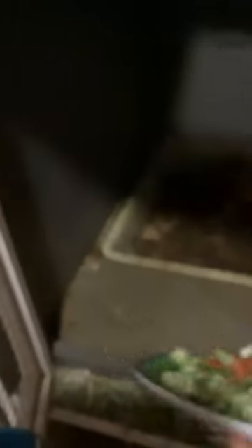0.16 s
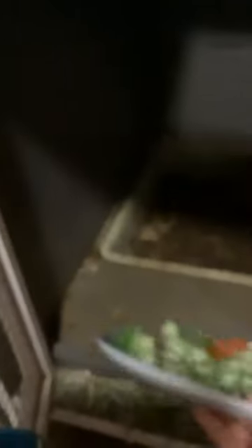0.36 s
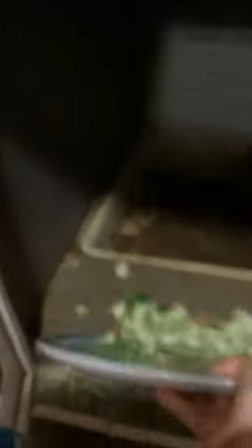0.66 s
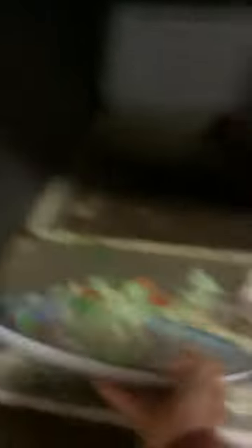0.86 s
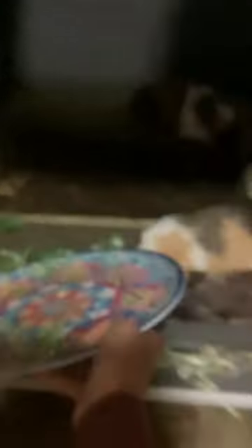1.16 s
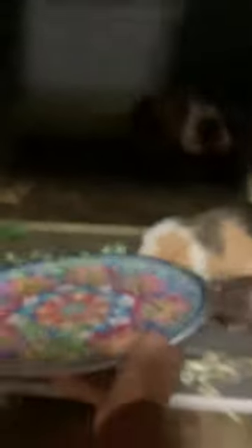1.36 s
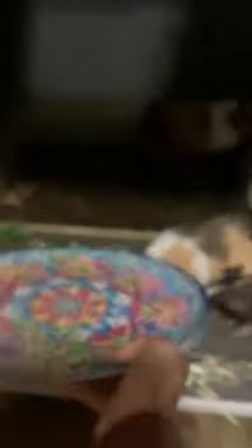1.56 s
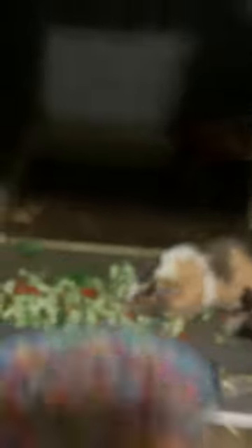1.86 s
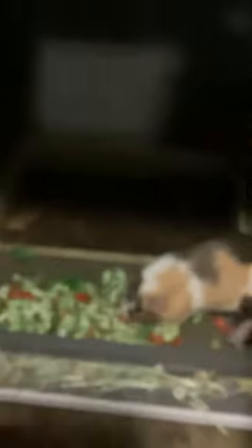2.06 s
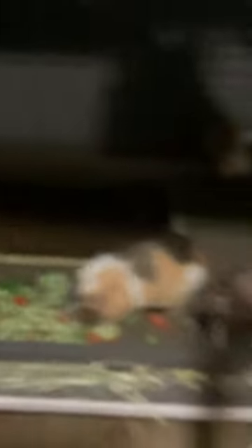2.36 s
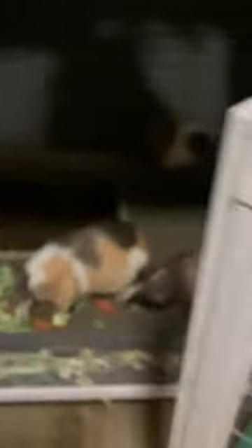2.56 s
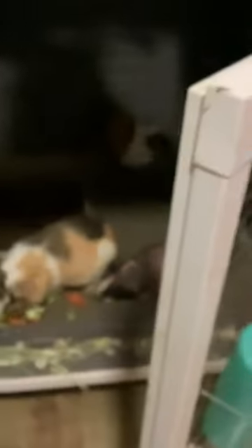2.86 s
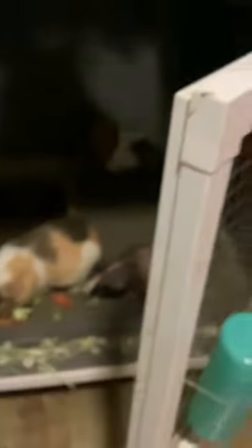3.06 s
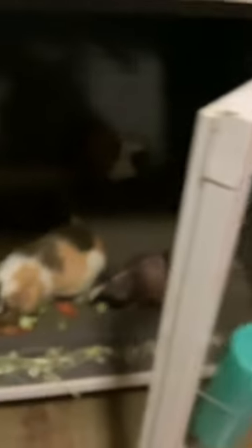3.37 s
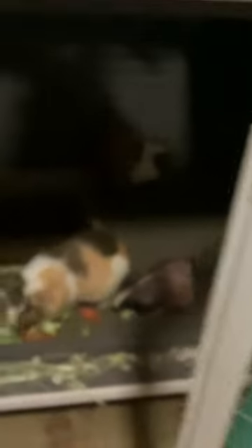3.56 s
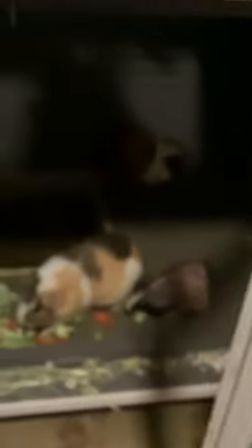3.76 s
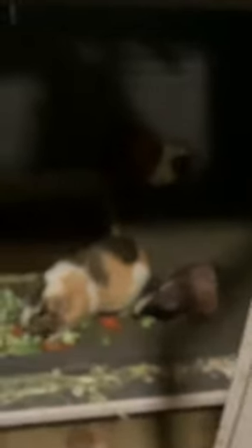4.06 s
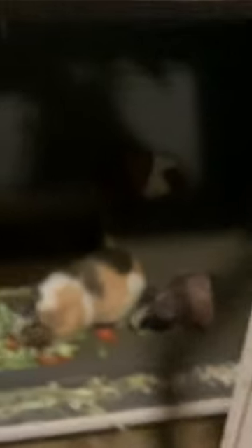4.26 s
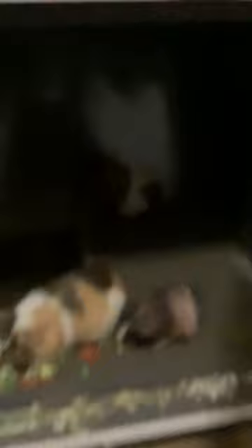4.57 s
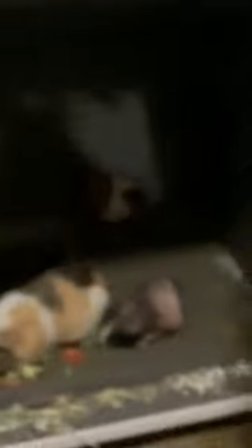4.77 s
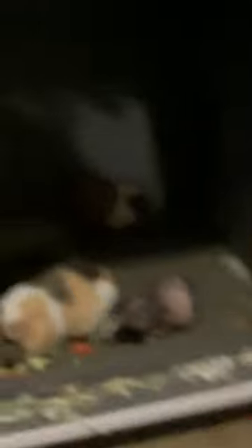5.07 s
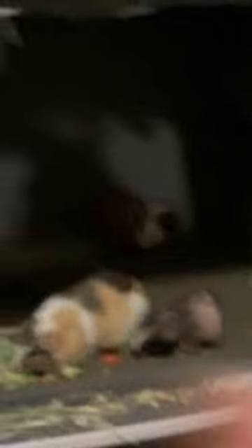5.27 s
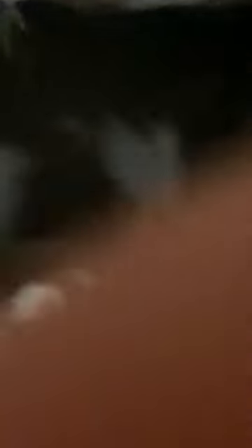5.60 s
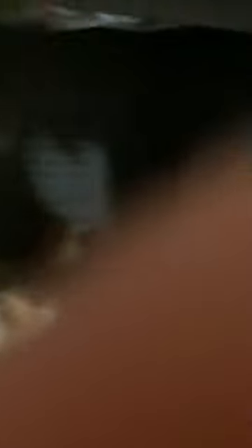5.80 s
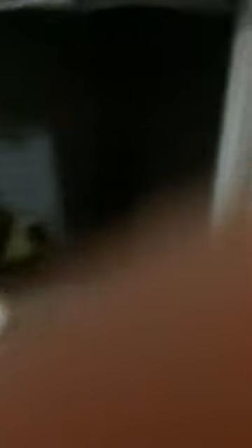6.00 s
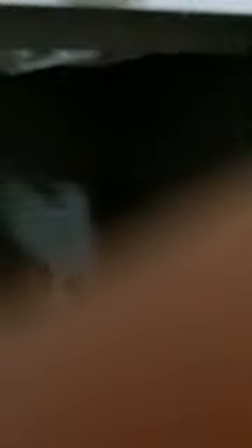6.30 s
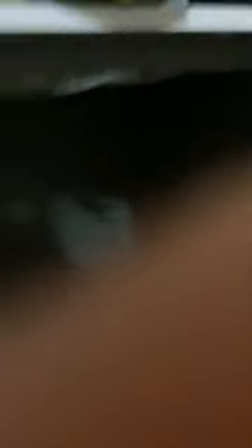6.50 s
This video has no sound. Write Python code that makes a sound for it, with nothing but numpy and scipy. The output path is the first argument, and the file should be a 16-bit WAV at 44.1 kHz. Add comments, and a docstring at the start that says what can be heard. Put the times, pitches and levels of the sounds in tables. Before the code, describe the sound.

Salad slides and patters off a china plate, a sharp plate knock, then a hutch door knocks, judders and bangs before quiet rustling and nibbling.

```python
"""In a quiet room, salad is tipped off a china plate into a wooden guinea pig hutch.
Leaves slide and patter as shaped noise; the rubbed plate rings faintly under them.
The plate knocks the hutch and the wire-mesh door knocks, judders and bangs: cracks, decaying modes and clatter.
The animals rustle and nibble, a hand fumbles near the microphone, and a thin tone whines faintly far away."""
import sys
import numpy as np
from scipy import signal
from scipy.fft import rfft, irfft, next_fast_len
from scipy.io import wavfile

SR = 44100
rng = np.random.default_rng(int(sys.argv[2]) if len(sys.argv) > 2 else 0)


def generate_wav(signal):
    """Clip the signal to [-1, 1] and save it as 16-bit WAV at the path in sys.argv[1]."""
    frames = np.transpose(np.atleast_2d(signal))
    scaled = np.clip(frames, -1, 1) * 32767
    pcm = np.round(scaled).astype(np.int16)
    wavfile.write(sys.argv[1], SR, pcm)


N = 292824
RING_SIZE = 16384  # longest single sound, in samples
AGE = np.arange(RING_SIZE) / SR  # seconds since a sound began
TIME = np.arange(N) / SR


def from_db(db):
    """Decibels to gain."""
    return 10 ** (np.asarray(db) / 20)


def rms_one(x):
    """Scale to unit power."""
    return x / np.sqrt(np.mean(x ** 2) + 1e-20)


def dying(t60):
    """Exponential decay by 60 dB in t60 seconds."""
    return np.exp(-np.log(1000) * AGE / max(t60, 1e-3))


def add(out, s, sound):
    """Mix a sound in at a time in seconds."""
    start = int(np.clip(s * SR, 0, N - 1))
    out[start:start + len(sound)] += sound[:N - start]


def envelope(points):
    """Gain over time, drawn in straight lines of decibels."""
    return from_db(np.interp(TIME, *np.transpose(points)))


def gains(spectrum, hz):
    """A spectrum's gain at given frequencies, falling away beyond its ends."""
    at, db = np.transpose(spectrum)
    inside = from_db(np.interp(np.log(hz + 1), np.log(at), db))
    below = np.minimum(hz / at[0], 1) ** 2
    above = np.minimum(at[-1] / (hz + 1), 1) ** 2
    return inside * below * above


def coloured(x, spectrum):
    """Give a noise a spectrum; rms 1."""
    size = next_fast_len(len(x))
    shaped = rfft(x, size) * gains(spectrum, np.fft.rfftfreq(size, 1 / SR))
    return rms_one(irfft(shaped, size)[:len(x)])


def low_pass(x, hz):
    """Second-order low-pass."""
    return signal.sosfilt(signal.butter(2, min(hz, .45 * SR), fs=SR, output="sos"), x)


def slow_noise(hz):
    """Noise of rms 1 that wanders no faster than about the given rate."""
    return rms_one(low_pass(rng.standard_normal(N), hz))


def grainy(size, spread_db, per_s):
    """Noise whose strength varies from one tiny contact to the next."""
    knots = np.clip(rng.standard_normal(size), -2, 2)
    strength_db = spread_db * np.interp(np.arange(size) * per_s / SR, np.arange(size), knots)
    return rng.standard_normal(size) * from_db(strength_db)


def ringing(modes, vary_db, detune_hz=20):
    """Decaying modes, each struck with a strength of its own and beating against a weaker neighbour."""
    hz, db, t60 = np.transpose(modes)
    chance = rng.standard_normal((len(hz), 2))
    strength = from_db(db + vary_db * chance[:, 0]) / np.linalg.norm(from_db(db))
    offset = detune_hz * (1 + np.abs(chance[:, 1])) * np.sqrt(hz / 500)
    neighbour = hz + np.sign(chance[:, 1]) * offset
    out = np.zeros(RING_SIZE)
    for k in range(len(hz)):
        pair = np.sin(2 * np.pi * hz[k] * AGE) + np.sin(2 * np.pi * neighbour[k] * AGE) / 3
        out += (-1) ** k * strength[k] * dying(t60[k]) * pair  # alternating polarity
    return out


def contact(hz, octaves, skirt_db, rise_s, t60):
    """A quickly dying hump of sound around one pitch; peak 1."""
    corners_hz = hz * np.exp2(octaves * np.array([-2.5, -0.84, -0.9, 0.8, 2.1]))
    hump = list(zip(corners_hz, [skirt_db, -6, 0, -6, skirt_db]))
    thud = coloured(rng.standard_normal(RING_SIZE), hump) * dying(t60) * (1 - dying(rise_s))
    return thud / np.abs(thud).max()


def sweeping_crack(colour, spread_s):
    """Bending waves travel faster at high pitch, so a crack sweeps downwards; peak 1."""
    hz = np.fft.rfftfreq(RING_SIZE, 1 / SR)
    # minimum phase: the crack starts at once and then dies away
    cepstrum = irfft(np.log(gains(colour, hz) + 1e-4))
    prompt = np.exp(rfft(2 * cepstrum[:RING_SIZE // 2], RING_SIZE))
    crack = irfft(prompt * np.exp(-4j * np.pi * spread_s * np.sqrt(1000 * hz)))
    return crack / np.abs(crack).max()


def blows(hits, colour, modes, crack_db, spread_s, ring_db, clatter_db, clatter_t60):
    """Each blow is a crack, the body's own modes and a short clatter of the boards around it."""
    out = np.zeros(N)
    crack = from_db(crack_db) * sweeping_crack(colour, spread_s)
    swell = 1 - dying(0.013)
    for s, db, bright_hz in hits:
        noise = coloured(rng.standard_normal(RING_SIZE), colour)
        clatter = from_db(clatter_db) * noise * dying(clatter_t60) * swell
        ring = from_db(ring_db) * ringing(modes, vary_db=3.5) * swell
        add(out, s, from_db(db) * low_pass(crack + ring + clatter, bright_hz))
    return out


def room(x, wet_db, t60, wall_hz):
    """Diffuse reflections build up, then die away, dulled by the walls."""
    tail = low_pass(rng.standard_normal(RING_SIZE), wall_hz) * dying(t60) * (1 - dying(0.0067)) ** 2
    return x + from_db(wet_db) * signal.fftconvolve(x, tail / np.linalg.norm(tail))[:N]


def room_tone(level_db):
    """The quiet room's steady bed of shaped noise."""
    # spectrum of the air: (frequency [Hz], relative level [dB])
    air_colour = [(25, -35), (50, -6), (80, -4), (190, -3), (285, 2), (394, -2), (516, 0.5), (936, -7),
                  (1560, -9.5), (2050, -20.5), (3080, -25.5), (5280, -32), (6380, -37.5), (11600, -30.5),
                  (16000, -42.5)]
    return from_db(level_db) * coloured(rng.standard_normal(N), air_colour)


def whine(waver_db):
    """A thin far tone climbs slowly and sinks at the end, wavering in strength."""
    # path of the tone: (time [s], frequency [Hz], level [dB])
    path = [(4.3, 1320, -84), (4.85, 1430, -76), (5.3, 1500, -74), (5.72, 1552, -65), (6.1, 1590, -69),
            (6.45, 1612, -67), (6.64, 1520, -68)]
    s, hz, db = np.transpose(path)
    level_db = np.interp(TIME, s, db, left=-120) + waver_db * slow_noise(9.8)
    phase = 2 * np.pi * np.cumsum(np.interp(TIME, s, hz)) / SR
    return from_db(level_db) * np.sqrt(2) * np.sin(phase)


def fumbling():
    """A hand near the microphone: short, broad clicks and a few taps on something small that rings."""
    # dry clicks: (time [s], peak level [dB], centre [Hz])
    clicks = [(4.91, -39, 500), (5.387, -33.5, 900), (5.507, -43.5, 4500), (5.593, -40, 2000),
              (6.227, -42, 1790), (6.257, -44, 1300), (6.582, -43, 3000)]
    # light taps: (time [s], level [dB])
    taps = [(5.45, -44.5), (5.721, -36.5), (6.057, -46), (6.104, -47.5)]
    # ringing of the tapped thing: (frequency [Hz], relative level [dB], t60 [s])
    tap_modes = [(1013, 2.5, 0.088), (1130, -8, 0.045), (910, -2, 0.045)]
    out = np.zeros(N)
    for s, db, hz in clicks:
        add(out, s, from_db(db) * contact(hz, octaves=0.78, skirt_db=-20.5, rise_s=0.0024, t60=0.022))
    for s, db in taps:
        add(out, s, from_db(db) * ringing(tap_modes, vary_db=1.0))
    return out


def shuffling(trim_db):
    """Dull, uneven shuffling of the hand and sleeve."""
    # how busily hand, plate and sleeve move: (time [s], level before the trim [dB])
    handling = [(0, -40.5), (.42, -37.5), (.78, -43.5), (.95, -62), (1.4, -56), (1.88, -51.5), (2.12, -39),
                (2.55, -55.5), (2.9, -38.5), (3.3, -48.5), (3.8, -49.5), (4.0, -59), (4.25, -44.5),
                (4.7, -55), (5.45, -48.5), (5.9, -45), (6.05, -59.5), (6.64, -60)]
    # spectrum of the shuffling: (frequency [Hz], relative level [dB])
    dull_colour = [(29, -47), (50, 1), (86, 6), (171, -0.5), (288, 0), (503, -4), (546, -7.5), (632, -16),
                   (709, -6.5), (2500, -27.5), (3250, -59.5), (5500, -120)]
    grains = grainy(N, spread_db=8.5, per_s=64)
    return from_db(trim_db) * envelope(handling) * coloured(grains, dull_colour)


def bumps(trim_db):
    """Padded contacts are dull; low ones last longer."""
    # soft bumps of hand, plate, paws and hutch floor: (time [s], level before the trim [dB], centre [Hz])
    soft_hits = [(.002, -30.5, 126), (.047, -32.5, 950), (0.3, -26, 1050), (.407, -21.5, 610),
                 (0.412, -35.5, 101), (.453, -31, 328), (.489, -26, 373), (0.552, -22.5, 347),
                 (0.578, -28.5, 327), (.609, -36, 634), (0.783, -37, 159), (1.132, -32.5, 420),
                 (1.153, -35.5, 160), (1.378, -37, 133), (1.605, -33, 610), (1.657, -36, 504),
                 (2.091, -50, 910), (2.117, -28.5, 140.7), (2.404, -29, 1990), (3.818, -39, 88),
                 (4.999, -36, 348), (5.199, -38, 337), (5.39, -37.5, 130), (5.585, -32.5, 226),
                 (5.643, -32, 1270), (5.719, -33, 1080), (5.872, -28, 318), (6.203, -35.5, 880),
                 (6.256, -39, 650), (6.3, -36.5, 480)]
    out = np.zeros(N)
    for s, db, hz in soft_hits:
        t60 = 0.072 * (500 / hz) ** 0.63
        add(out, s, from_db(db + trim_db) * contact(hz, octaves=0.49, skirt_db=-20, rise_s=0.011, t60=t60))
    return out


def nibbles():
    """Faint ticks of chewing at random moments, as rows of snaps."""
    per_s = 2.8
    level_db, spread_db, body_db = -45.5, 2.5, -16  # before the trims of snaps; body relative to treble
    chance = rng.random((80, 2))
    times = np.cumsum(-np.log(1 - chance[:, 0])) / per_s
    levels = level_db + spread_db * (2 * chance[:, 1] - 1)
    return [(s, db, db + body_db) for s, db in zip(times, levels) if s < N / SR]


def snaps(treble_trim_db, body_trim_db):
    """A leaf or stalk breaks with one sharp crack and a quick run of tiny ones; chewing ticks likewise."""
    # crisp snaps of leaves and hay: (time [s], treble level before trim [dB], body level before trim [dB])
    breaks = [(.1177, -34, -40.5), (.3701, -27, -40.5), (.762, -34, -45), (.845, -25.5, -51),
              (.9538, -37, -45), (1.0113, -23.5, -44.5), (1.0488, -37, -45.5), (1.2194, -38, -53),
              (1.311, -23.5, -48), (1.3718, -57, -46.5), (1.5238, -29, -50.5), (1.6488, -32, -48),
              (1.9051, -40, -53), (2.0921, -47, -34), (2.1408, -35, -30), (2.197, -28.5, -39),
              (2.2266, -35, -39.5), (2.2624, -30.5, -40), (2.3132, -47, -35.5), (2.4049, -57, -46),
              (2.4853, -37, -39), (2.7562, -27.5, -52), (2.834, -63, -44), (2.998, -36, -40),
              (3.7204, -33, -47.5), (3.8702, -24, -55), (4.152, -30.5, -53), (4.1834, -33.5, -63),
              (4.512, -22.5, -48), (4.6033, -36, -47), (4.8047, -40, -48), (4.8532, -47.5, -50),
              (5.0653, -50, -57), (5.3343, -45, -64), (5.8393, -62, -45)]
    # spectrum of the treble: (frequency [Hz], relative level [dB])
    treble_colour = [(3500, -42), (6500, -4.5), (9500, 9), (12500, 0.5), (16000, 4.5)]
    # spectrum of the body: (frequency [Hz], relative level [dB])
    body_colour = [(600, 14), (1400, 8), (3000, 3.5), (5300, 11), (7500, -2.5)]
    treble, body = np.zeros(N), np.zeros(N)
    # the first break stands out from the cracks that follow; the treble dies before the body
    treble_decay = dying(0.05) + dying(0.005)
    body_decay = dying(0.084)
    for s, treble_db, body_db in list(breaks) + nibbles():
        add(treble, s, from_db(treble_db + treble_trim_db) * treble_decay)
        add(body, s, from_db(body_db + body_trim_db) * body_decay)
    cracks = grainy(N, spread_db=3.0, per_s=1800)
    return treble * coloured(cracks, treble_colour) + body * coloured(cracks, body_colour)


def rustling(rustle_trim_db, crinkle_trim_db):
    """Fine, clumped grains of moving leaves: the whole heap, and single leaves that swell and fade."""
    # salad on the move; it is poured, spills at the knock, then is nosed about:
    # (time [s], level before the trims [dB])
    leaf_flow = [(0, -45.5), (.18, -55), (.25, -44.5), (.4, -46.5), (.52, -53.5), (.79, -50.5),
                 (1.05, -60.5), (1.25, -71), (1.87, -61), (2.12, -34), (2.3, -53.5), (2.58, -78),
                 (4.05, -70.5), (4.55, -59), (5.12, -70.5), (5.35, -60), (6.0, -65), (6.64, -69)]
    # single leaves dragged or tugged: (time of the loudest moment [s], rise and fall time, each [s],
    # level before the trims [dB], crinkle relative to rustle before the trims [dB])
    tugs = [(1.146, 0.039, -53.5, -0.5), (1.42, 0.099, -65, 0), (1.546, 0.055, -56.5, 5),
            (2.424, 0.035, -60, 12), (2.493, 0.072, -64, 8), (2.978, 0.12, -55, -2),
            (3.171, 0.043, -56.5, 1.5), (3.347, 0.041, -52.5, 8.5), (3.72, 0.083, -53, -2),
            (3.864, 0.031, -60, 10.5), (4.027, 0.02, -72.5, 11), (4.256, 0.078, -44, -9),
            (4.494, 0.048, -57.5, 8.5), (4.638, 0.065, -60, 6.5), (4.802, .05, -57, 0),
            (4.95, 0.13, -57.5, -6), (5.252, 0.1, -54, -6), (5.393, 0.13, -65.5, 4.5),
            (5.603, 0.048, -64, -21), (5.863, 0.071, -49.5, -21), (6.106, 0.024, -62, 3),
            (6.255, 0.15, -63, -28), (6.38, 0.05, -66.5, 0), (6.475, 0.028, -60, -17)]
    # spectrum of the rustle: (frequency [Hz], relative level [dB])
    rustle_colour = [(900, -5), (1700, -1), (3000, -7.5), (5200, -6.5), (6500, -12), (9000, -19)]
    # spectrum of the crisper crinkle: (frequency [Hz], relative level [dB])
    crinkle_colour = [(4500, -2.5), (7000, 2), (10000, 6), (13000, 4), (16000, 2)]
    fits_db = 2.5 * slow_noise(8)  # the heap moves in fits and starts
    rustle = envelope(leaf_flow) * from_db(fits_db)
    crinkle = rustle * from_db(-9)  # before the trims
    for s, length, db, crisp_db in tugs:
        swell = from_db(db) * np.hanning(int(2 * length * SR))
        add(rustle, s - length, swell)
        add(crinkle, s - length, from_db(crisp_db) * swell)
    clumps = from_db(2.44 * slow_noise(34))
    leaves = clumps * grainy(N, spread_db=2.0, per_s=730)
    soft = rustle * from_db(rustle_trim_db) * coloured(leaves, rustle_colour)
    crisp = crinkle * from_db(crinkle_trim_db) * coloured(leaves, crinkle_colour)
    return soft + crisp


def slide():
    """Friction of the sliding salad keeps the hand-damped plate ringing faintly."""
    # salad sliding over the china: (time [s], level [dB])
    rubbing = [(0, -52), (.12, -62), (.19, -63), (.26, -50.5), (.36, -55.5), (.55, -68), (.7, -68),
               (.78, -50.5), (.86, -79), (.96, -59.5), (1.06, -67), (1.2, -73), (1.9, -85)]
    # rings of the rubbed china: (frequency [Hz], relative level [dB], t60 [s])
    china_rings = [(2700, 0, .033), (3510, -2, .026), (4580, -2, .016), (5460, 0, .022)]
    friction = grainy(N, spread_db=2.5, per_s=600)
    rubbed = signal.fftconvolve(friction, ringing(china_rings, vary_db=1.5))[:N]
    return envelope(rubbing) * rms_one(rubbed)


def door_judder():
    """The door sticks and slips on its sill; the harder it slips, the brighter the contact."""
    # slips: (time [s], level [dB])
    slips = [(2.969, -31), (2.977, -29.5), (3.001, -30.5), (3.027, -34.5), (3.149, -33), (3.168, -30),
             (3.196, -22.5), (3.26, -24), (3.289, -26.5), (3.304, -26.5), (3.389, -26.5), (3.404, -31),
             (3.421, -21.5), (3.43, -28), (3.469, -23.5), (3.494, -20), (3.509, -19), (3.519, -20),
             (3.533, -33.5)]
    # spectrum of a slip: (frequency [Hz], relative level [dB])
    colour = [(120, -20), (180, 5.5), (260, -29.5), (340, 5), (480, -4), (950, 6.5), (1250, -10),
              (2200, -21), (3200, -21.5), (4700, -15), (5600, -28.5), (8000, -33.5)]
    # ringing of the juddering door: (frequency [Hz], relative level [dB], t60 [s])
    modes = [(172, -12, .35), (345, -5, .16), (420, -3, .14), (500, 0, .14), (665, 0, .16), (765, -3, .1),
             (862, -3, .1), (955, 0, .09), (1080, -7, .08), (1310, -13, .1), (1550, -12, .06),
             (2130, -13, .05), (2400, -16, .05), (2740, -15, .05), (3570, -14, .055), (4100, -18, .04),
             (4520, -14, .05), (4800, -17, .04), (5470, -17, .05)]
    # brightness is 3100 Hz at -21.5 dB and doubles with every 5.5 dB
    hits = [(s, db, 3100 * 2 ** ((db + 21.5) / 5.5)) for s, db in slips]
    return blows(hits, colour, modes, crack_db=0, spread_s=.002,
                 ring_db=-7, clatter_db=-12, clatter_t60=.075)


def frame_knocks():
    """The door frame knocks, ringing in its own modes; a dull echo follows the first knock."""
    # knocks, and a dull echo of the first at 2.677 s: (time [s], level [dB], brightness [Hz])
    hits = [(2.6535, -6, 10800), (2.677, -27, 2480), (2.7295, -11.5, 6500), (2.7735, -19.5, 2100),
            (2.823, -30, 593)]
    # spectrum of a knock: (frequency [Hz], relative level [dB])
    colour = [(120, -20.5), (260, -13), (440, -4.5), (600, -19.5), (860, -3.5), (1050, -16), (1300, -1.5),
              (1500, -14), (2300, -13), (3100, -24), (3700, -11.5), (5200, -21.5), (10400, -33),
              (16000, -49)]
    # ringing of the frame: (frequency [Hz], relative level [dB], t60 [s])
    modes = [(412, 3, .19), (463, 2, .17), (829, -6, .12), (880, -7, .09), (1281, -1, .08), (1739, -15, .1),
             (2342, -10, .08), (2611, -6, .07), (3560, -11, .08), (4140, -15, .06), (4533, -11, .05),
             (4867, -9, .055), (5755, -13, .04)]
    return blows(hits, colour, modes, crack_db=-2.0, spread_s=0.001994,
                 ring_db=-7, clatter_db=-3.5, clatter_t60=0.036)


def door_bangs():
    """The door bangs against the hutch, ringing lower than the plate."""
    # bangs: (time [s], level [dB], contact brightness [Hz])
    hits = [(3.5555, -3.5, 10800), (3.561, -8, 4000), (3.578, -9, 1500), (3.590, -18.5, 6900),
            (3.5965, -4, 7000), (3.602, -16.5, 3500), (3.611, -8.5, 1770)]
    # spectrum of a bang: (frequency [Hz], relative level [dB])
    colour = [(60, -51.5), (105, -29.5), (156, -23), (199, -16), (240, -18), (305, -4), (413, -2),
              (563, -16.5), (702, -4), (785, -6), (1000, -11.5), (1370, -18), (2550, -17.5), (2760, -9.5),
              (3150, -27.5), (3470, -14), (5800, -28), (7500, -39), (16000, -55)]
    # ringing of the door: (frequency [Hz], relative level [dB], t60 [s])
    modes = [(105, -13, .32), (303, -1, .18), (352, 0, .15), (409, 0, .14), (474, -3, .15), (520, -3, .14),
             (624, -3, .17), (690, -4, .12), (743, -5, .15), (905, -5, .11), (955, -5, .11),
             (1015, -4, .11), (1087, -7, .1), (1491, -14, .12), (1895, -13, .09), (2768, 1, .09),
             (3429, -2, .075), (3620, -10, .07)]
    return blows(hits, colour, modes, crack_db=-4.5, spread_s=0.001433,
                 ring_db=-12, clatter_db=-5.0, clatter_t60=0.047)


def plate_knocks():
    """The china plate is knocked against the hutch in a quick run of contacts."""
    # knocks: (time [s], level [dB], contact brightness [Hz])
    hits = [(1.9497, 3.5, 6000), (1.9511, -0.5, 2500), (1.9555, -13.5, 14000), (1.964, -3.5, 15000),
            (1.9718, -9, 8900), (1.9785, -1.5, 9000), (1.984, -42, 2960)]
    # spectrum of a knock: (frequency [Hz], relative level [dB])
    colour = [(71, -55), (120, -36), (378, -15.5), (463, -34), (727, 2.5), (1140, -16), (1490, -4),
              (2480, -28), (2750, -9), (3110, -40), (3520, -19), (5190, -26), (5630, -15.5), (6110, -26.5),
              (16000, -33.5)]
    # ringing of the plate: (frequency [Hz], relative level [dB], t60 [s])
    modes = [(474, 7, .18), (577, 4, .38), (661, 3, .13), (723, 6, .15), (822, -2, .12), (880, 0, .08),
             (950, -2, .09), (1085, -8, .08), (1385, -2, .07), (1495, 1, .08), (1555, -1, .07),
             (1670, -3, .08), (1915, -15, .08), (2662, -3, .055), (2820, -14, .06), (4140, -14, .05),
             (4511, -9, .05), (5562, -1, .05), (5690, -12, .05)]
    return blows(hits, colour, modes, crack_db=-5.0, spread_s=0.000786,
                 ring_db=-16.5, clatter_db=-4, clatter_t60=0.028)


def scene():
    """Everything in and around the hutch, heard from one close microphone."""
    air = room_tone(level_db=-54.5) + whine(waver_db=5.0)
    stir = shuffling(trim_db=-8.0) + rustling(rustle_trim_db=-6.5, crinkle_trim_db=-7.5) + slide()
    leaves = room(snaps(treble_trim_db=-15.0, body_trim_db=-2.0), wet_db=-10.5, t60=0.22, wall_hz=14840)
    struck = bumps(trim_db=-4.0) + door_judder() + frame_knocks() + door_bangs() + plate_knocks()
    knocks = room(struck, wet_db=-8.5, t60=0.18, wall_hz=11200)
    return (air + fumbling() + stir + leaves + knocks)[None]


def record(dry):
    """The loudest peaks are rounded off, the deepest bass is lost and the top is cut."""
    rounded = dry / (1 + dry ** 4) ** .25
    thin = signal.sosfilt(signal.butter(3, 48, "high", fs=SR, output="sos"), rounded)
    return signal.sosfilt(signal.ellip(10, .2, 70, 16000, fs=SR, output="sos"), thin)


dry = scene()
out = record(dry)
generate_wav(out)
```